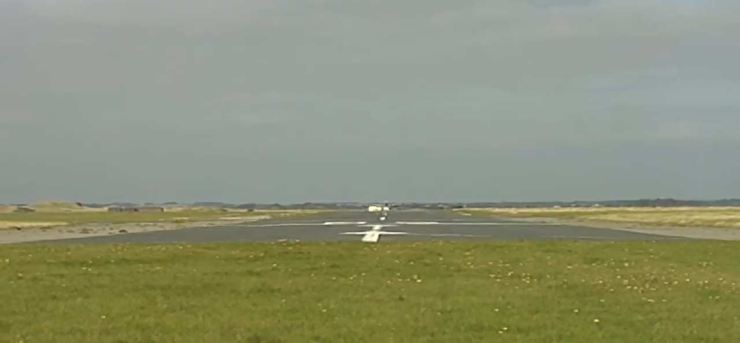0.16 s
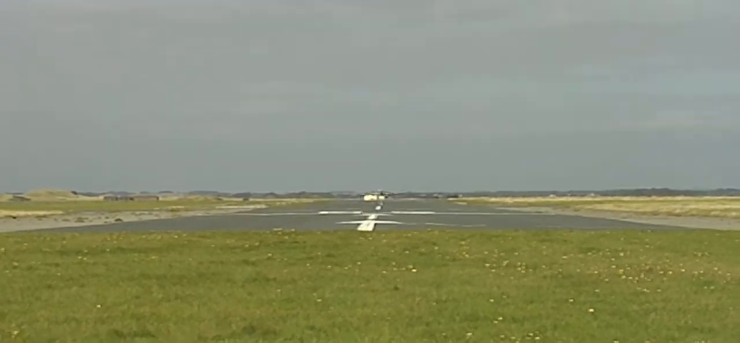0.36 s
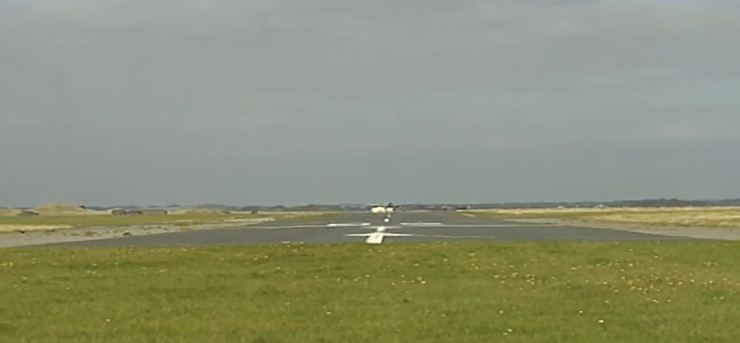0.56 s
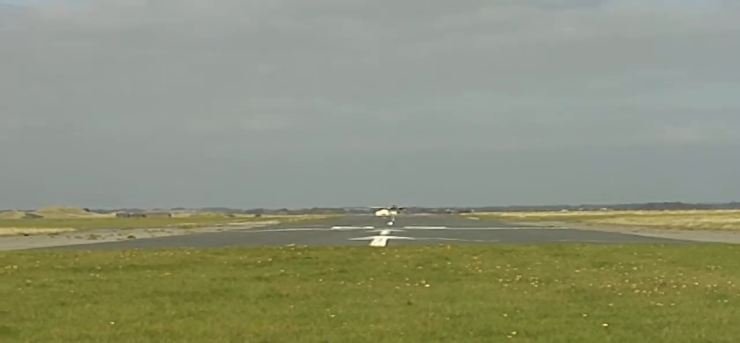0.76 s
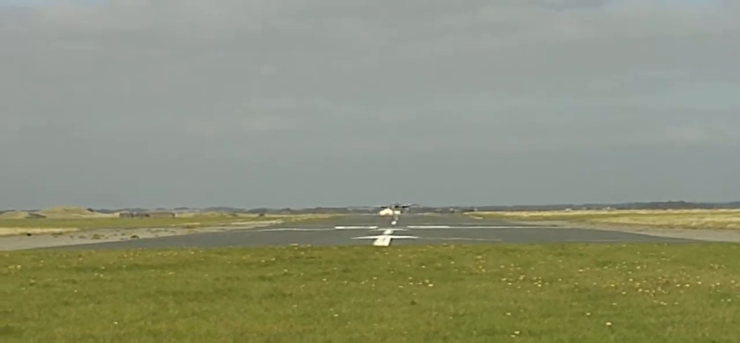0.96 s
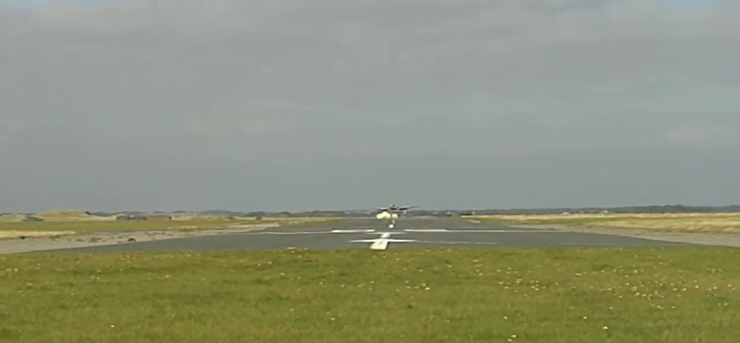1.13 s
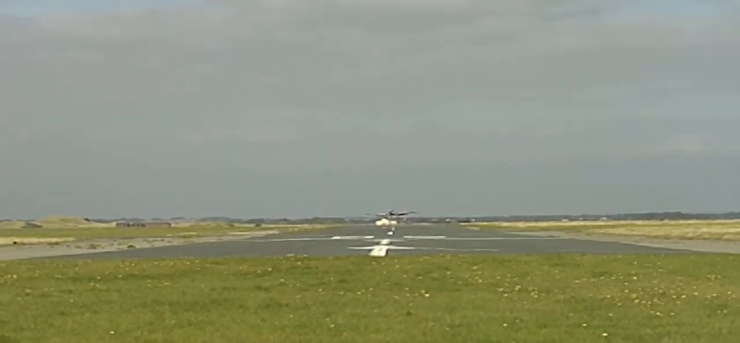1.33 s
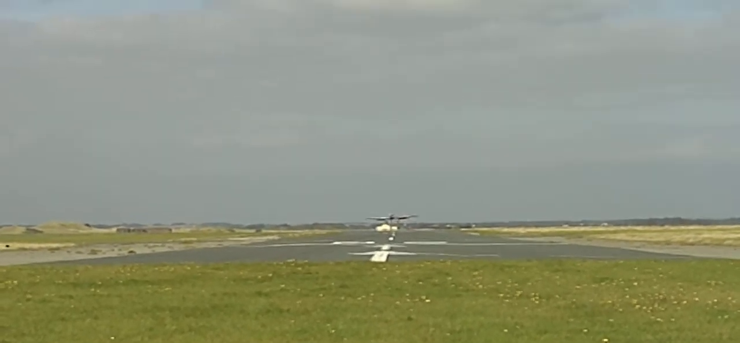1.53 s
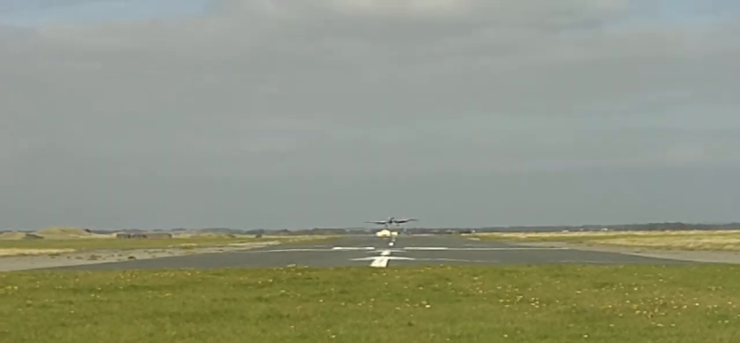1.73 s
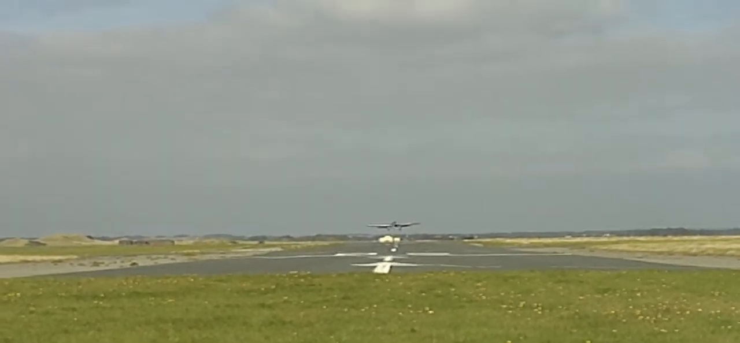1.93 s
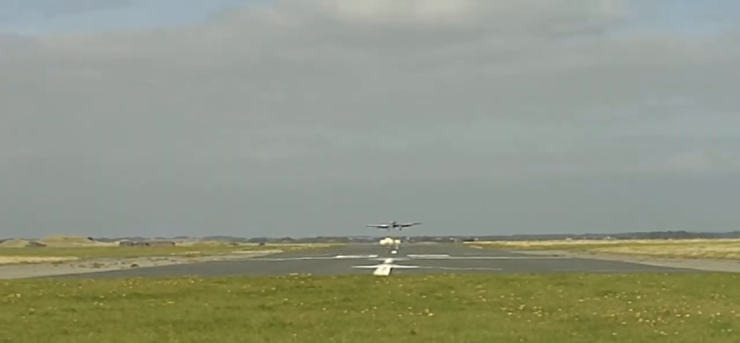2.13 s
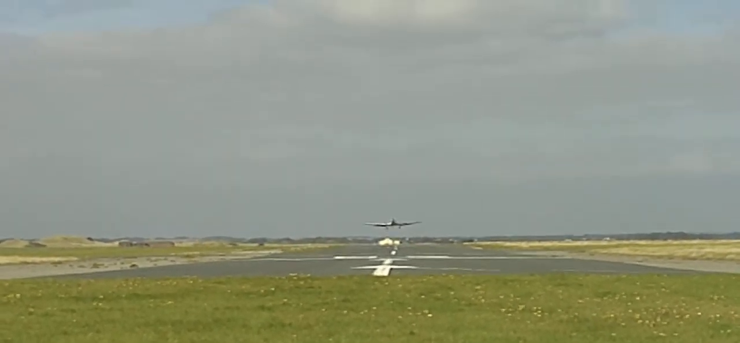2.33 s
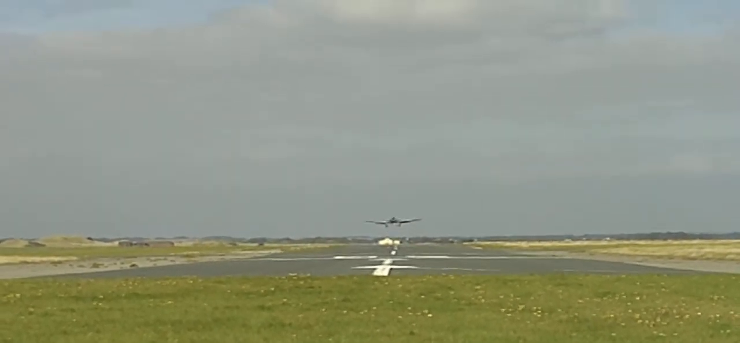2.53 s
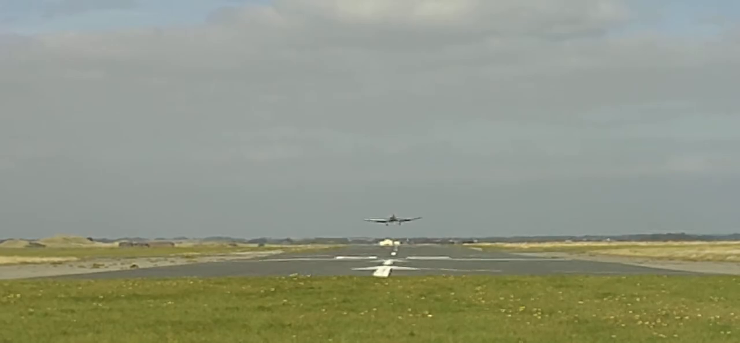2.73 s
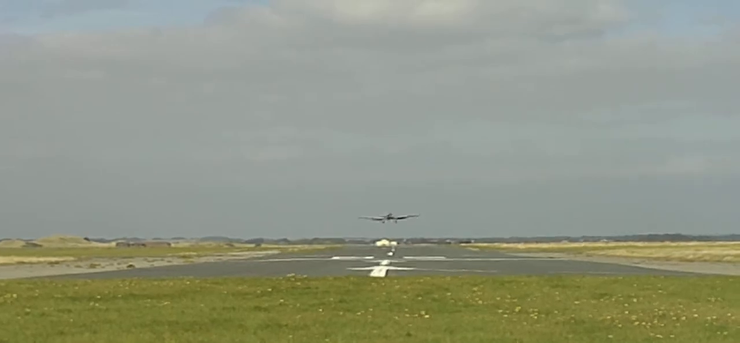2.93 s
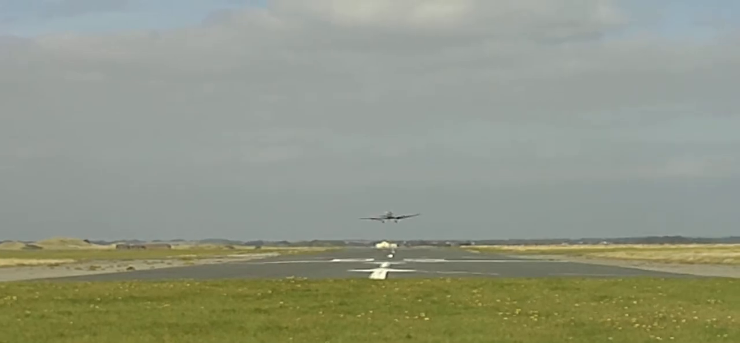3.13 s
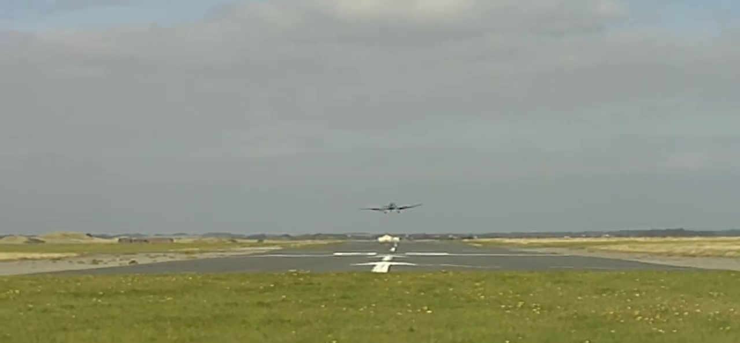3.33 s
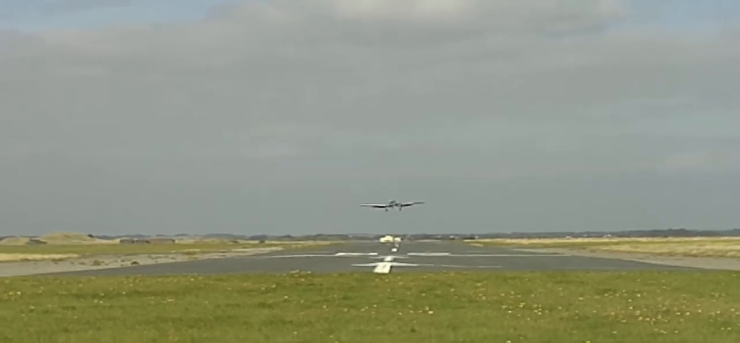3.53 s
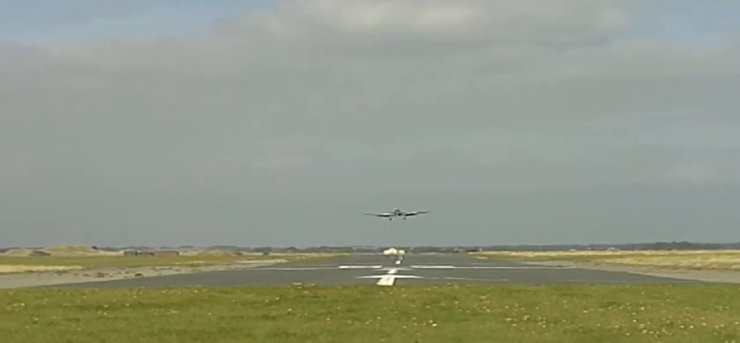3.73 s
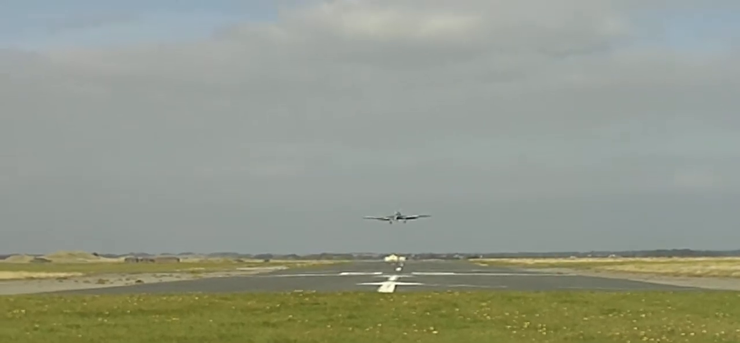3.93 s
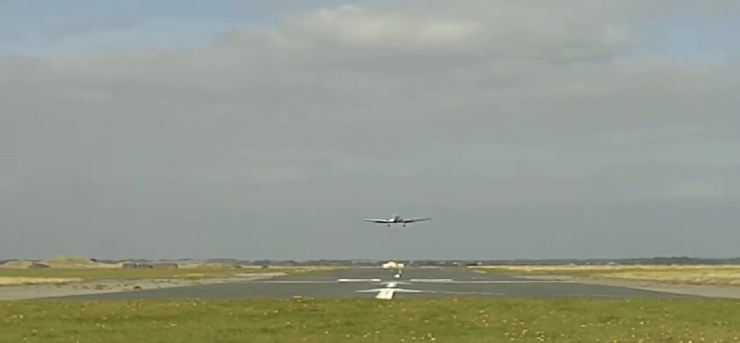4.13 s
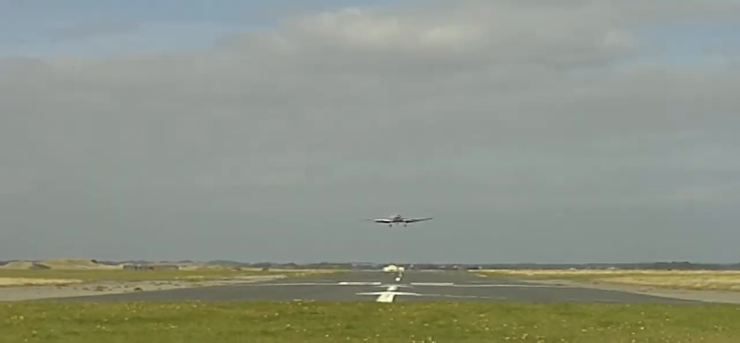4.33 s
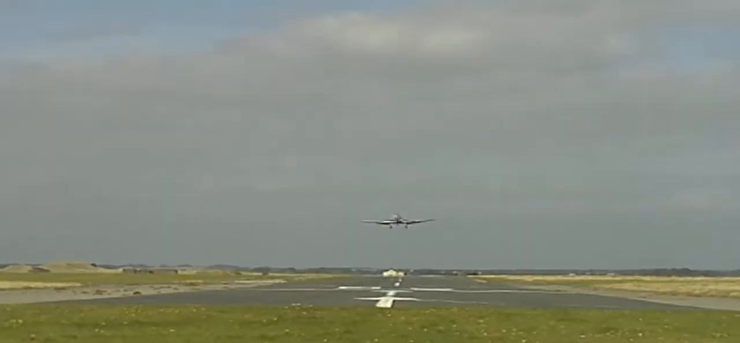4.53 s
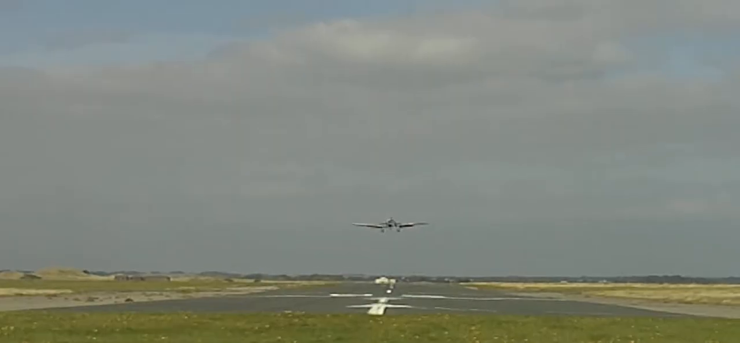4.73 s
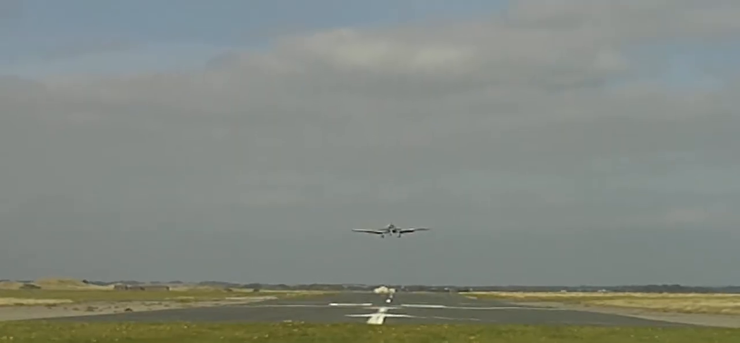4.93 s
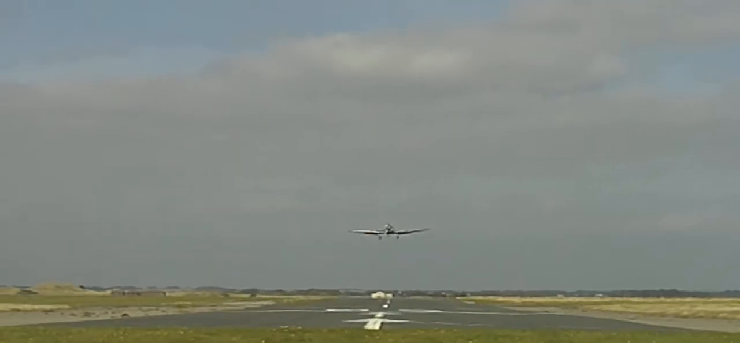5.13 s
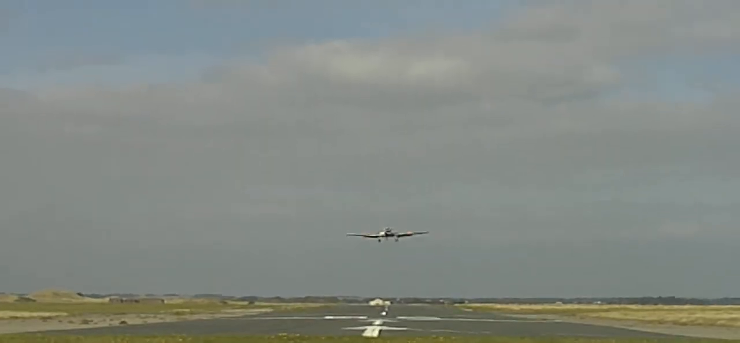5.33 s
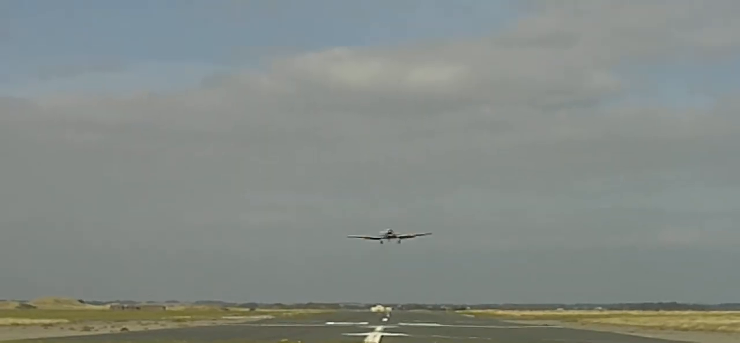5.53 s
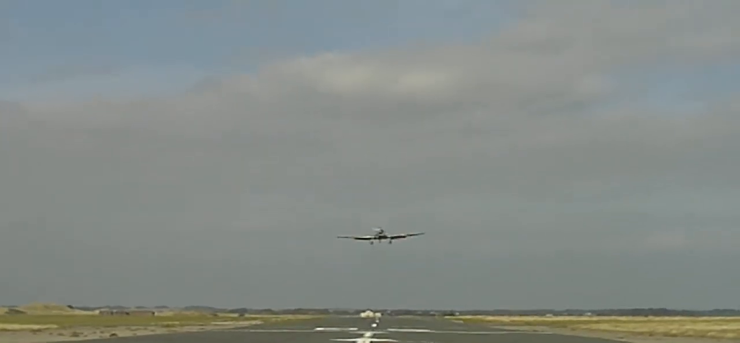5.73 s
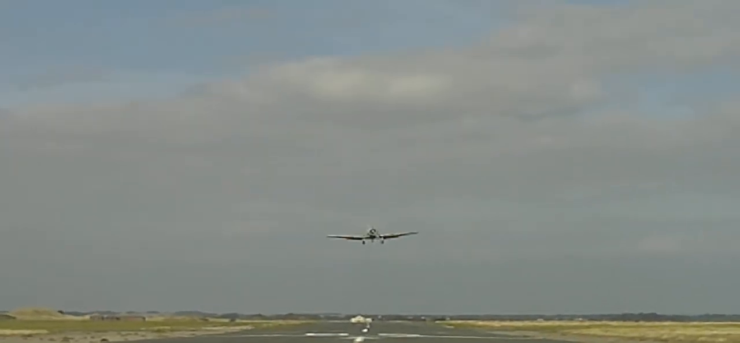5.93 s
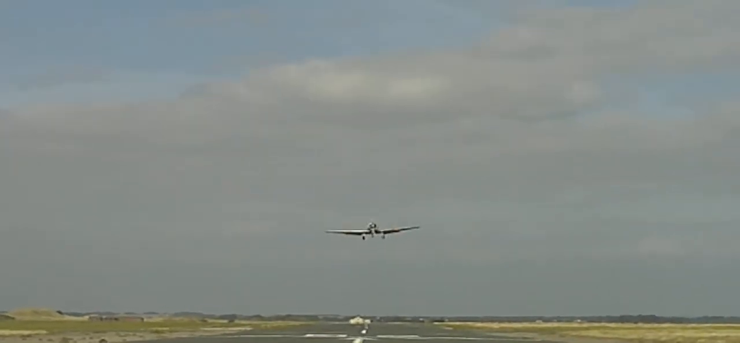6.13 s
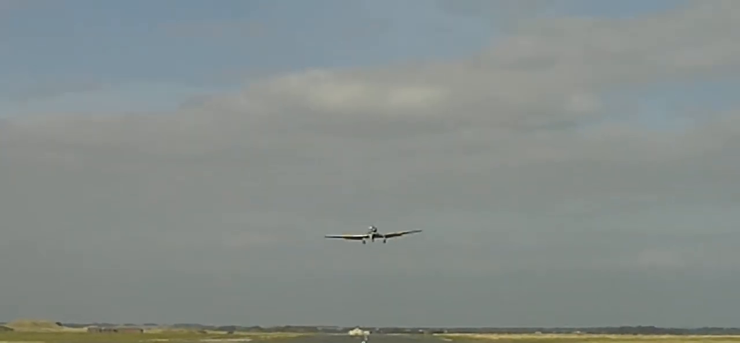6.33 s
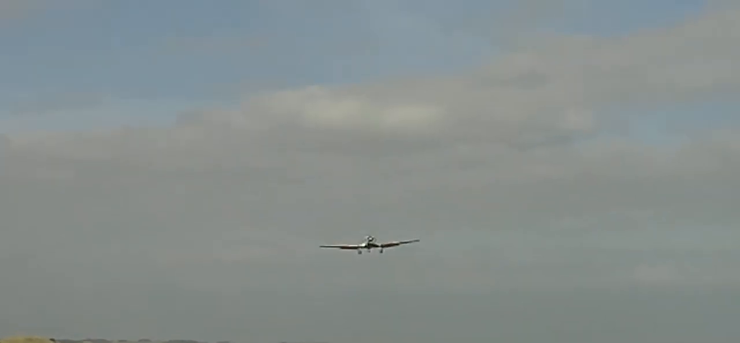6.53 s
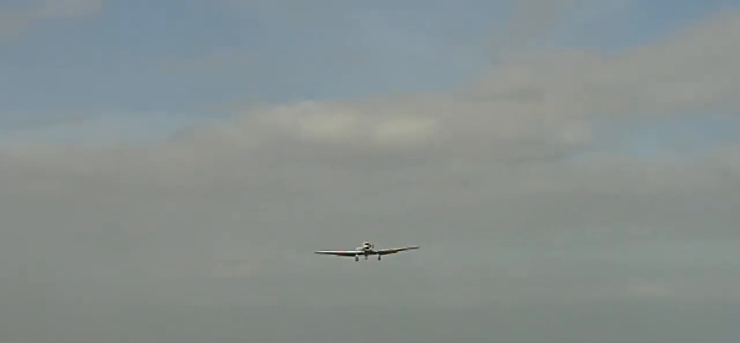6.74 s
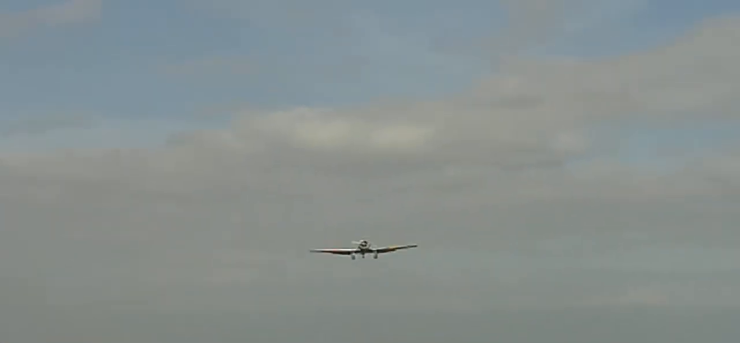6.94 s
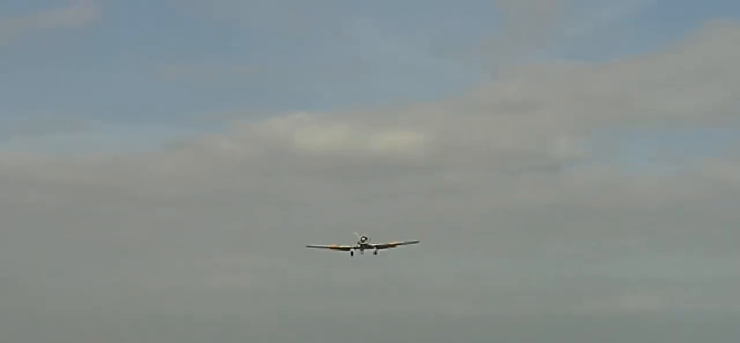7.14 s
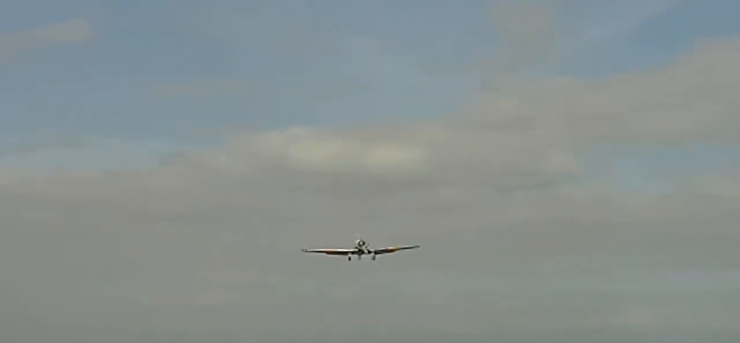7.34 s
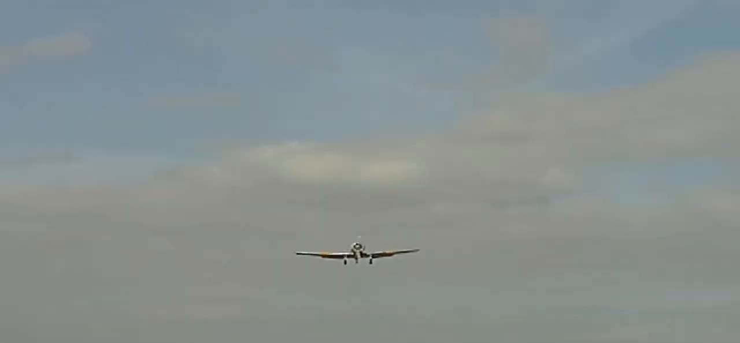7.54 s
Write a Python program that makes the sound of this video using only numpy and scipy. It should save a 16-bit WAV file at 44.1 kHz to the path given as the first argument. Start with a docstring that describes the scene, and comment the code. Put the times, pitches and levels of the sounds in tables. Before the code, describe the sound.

A propeller plane approaches from far away, its engine drone swelling into a loud, rasping growl over wind rumble on the microphone.

```python
"""Wind rumbles on the microphone over a far-off drone and a thin propeller whine and buzz.
A nine-cylinder radial-engined aircraft is climbing from a runway towards the listener at steady revs.
Its blades hum and its exhaust, a mix of engine tones and puffs of gas, swells and opens into a rasp.
The hand-held camera knocks a few times, and the hardest, closest firings overload the microphone."""
import sys
import numpy as np
from scipy import signal
from scipy.fft import rfft, irfft, next_fast_len
from scipy.io import wavfile

SR = 44100
rng = np.random.default_rng(int(sys.argv[2]) if len(sys.argv) > 2 else 0)


def wav_record(signal):
    """Record a signal, one row per channel, as 16-bit PCM in the file named by sys.argv[1]."""
    frames = np.transpose(np.atleast_2d(signal))
    bounded = np.clip(frames, -1, 1)
    # unit amplitude maps onto the largest positive 16-bit level
    quanta = np.round(bounded * 32767).astype(np.int16)
    wavfile.write(sys.argv[1], SR, quanta)


N = 338247
TIME = np.arange(N) / SR
CYLINDERS = 9


def from_db(db):
    """Decibels to gain."""
    return np.exp(np.asarray(db) * (np.log(10) / 20))


def rms_one(x):
    """Scale to unit rms."""
    return x / np.sqrt(np.mean(x ** 2) + 1e-20)


def curve(rows):
    """Join breakpoints into a value at every sample."""
    return np.interp(TIME, *np.transpose(rows))


def ramp(start_s, length_s):
    """A straight rise from 0 to 1."""
    return np.clip((TIME - start_s) / length_s, 0, 1)


def swell_and_fade(peak_s, peak_db, rise_db_per_s, fade_db_per_s):
    """Gain that climbs to a peak and sinks again."""
    past_peak = TIME - peak_s
    return from_db(peak_db + np.minimum(rise_db_per_s * past_peak, -fade_db_per_s * past_peak))


def follow(levels, near_db, depth):
    """Gain that rides a level curve, its moves scaled by depth; near_db when the source is close by."""
    close_by_db = -13
    return from_db(near_db + depth * (curve(levels) - close_by_db))


def blend(clean, rough, share):
    """Mix two unit-rms sounds; share is the clean one's part of the power."""
    share = np.clip(share, 0, 1)
    return np.sqrt(share) * clean + np.sqrt(1 - share) * rough


def drift(rate):
    """A smooth random wobble of spread 1 that changes about rate times a second."""
    step, run_in = 100, 2000
    r = np.exp(-2 * np.pi * rate * step / SR)
    white = rng.standard_normal(N // step + run_in + 2)
    slow = rms_one(signal.lfilter([1], [1, -2 * r, r * r], white)[run_in:])
    return np.interp(np.arange(N) / step, np.arange(len(slow)), slow)


def coloured(x, spectrum):
    """Shape a sound with an EQ curve that rolls off beyond its ends; rms 1."""
    size = next_fast_len(N)
    hz, db = np.transpose(spectrum)
    log_hz = np.log(np.maximum(np.fft.rfftfreq(size, 1 / SR), 1))
    gain = from_db(np.interp(log_hz, np.log(hz), db))
    skirts = np.exp(-4 * np.abs(log_hz - np.clip(log_hz, np.log(hz[0]), np.log(hz[-1]))))
    return rms_one(irfft(rfft(x, size) * gain * skirts, size)[:N])


def noise(spectrum):
    """Steady coloured noise."""
    return coloured(rng.standard_normal(N), spectrum)


def tones(cycles, orders, flicker_db, flicker_hz, wander_rad):
    """Harmonics of a rotation, each wavering in level and phase in turbulent air; rms 1."""
    out, angle = np.zeros(N), 2 * np.pi * (cycles % 1)
    for multiple, db in orders:
        k = round(multiple)
        stagger = 2 * np.pi * k * k / CYLINDERS  # keeps them from piling up in one beat
        phase = k * angle + stagger + wander_rad * drift(3.1)
        out += from_db(db + flicker_db * drift(flicker_hz)) * np.sin(phase)
    return rms_one(out)


def struck(times, levels_db, modes, grit_db, grit_s):
    """Clicks with brief gritty tails ring damped modes, neighbours in opposite polarity."""
    clicks, out = np.zeros(N), np.zeros(N)
    clicks[np.round(times * SR).astype(int)] = from_db(levels_db)
    tail = signal.lfilter([1], [1, -np.exp(-1 / (grit_s * SR))], clicks + 1e-18)
    force = clicks + from_db(grit_db) * tail * np.diff(rng.standard_normal(N + 1))
    for k, (hz, db, t60) in enumerate(modes):
        r, w = from_db(-60 / (t60 * SR)), 2 * np.pi * hz / SR
        ring = signal.lfilter([0, np.sin(w)], [1, -2 * r * np.cos(w), r * r], force)
        out += (-1) ** k * from_db(db) * ring
    return out


# The colour of open air. Each row: frequency in Hz, relative level in dB.
AIR_EQ = [(200, -7), (320, 1), (450, -7), (650, -14), (1000, -5), (1450, -12.5), (1750, -17), (2900, -19.5),
          (4500, -24), (5600, -31.5), (6500, -39), (7500, -52)]

def air_hiss():
    """A smooth bed of hiss that lifts after the loudest knock, holds and settles."""
    lift = ramp(3.3, 0.21) - ramp(4.14, 0.94)
    return from_db(-38.5 + 2.5 * lift) * noise(AIR_EQ)


# The colour of the wind. Each row: frequency in Hz, relative level in dB.
WIND_EQ = [(10, -9), (25, -2.5), (55, 2), (100, 2.5), (180, -11), (280, -13), (600, -48.5)]

def wind():
    """Lumpy rumble on the microphone from a steadily freshening wind."""
    start_db, rise_db_per_s = -33.5, 1.6
    lumps_db = 2.0 * drift(21)
    return from_db(start_db + rise_db_per_s * TIME + lumps_db) * noise(WIND_EQ)


# Bumps of the hand. Each row: start in seconds, knock strength in dB, tick strength in dB.
KNOCKS = [(.3492, -42, -13.5), (0.3659, -24, -56), (1.369, -27.5, -31), (3.0486, -9, -32.5),
          (3.330, -23, -45), (3.431, -23, -49), (3.851, -19.5, -16.5)]
# The case's knock and its plastic tick. Each row: frequency in Hz, gain in dB, 60 dB decay in seconds.
BODY_MODES = [(895, 11.5, 0.012), (1150, -7.5, 0.0056), (1320, -14.5, 0.06), (1840, -7, 0.011),
              (2070, -7, 0.011)]
TICK_MODES = [(2930, -7.5, 0.018), (3550, -11.5, 0.018), (3970, -13.5, 0.018), (4250, -14.5, 0.016),
              (5050, -7.5, 0.007), (6100, -8, 0.0044), (6500, -16.5, 0.012)]

def handling():
    """The camera's case knocks and ticks in the hand; it is too small to radiate bass."""
    times, knock_db, tick_db = np.transpose(KNOCKS)
    knocks = struck(times, knock_db, BODY_MODES, grit_db=-10.0, grit_s=0.0012)
    ticks = struck(times, tick_db, TICK_MODES, grit_db=-20.5, grit_s=0.0015)
    return signal.sosfilt(signal.butter(4, 740, "high", fs=SR, output="sos"), knocks + ticks)


# The blades' hum, throbbing on its way through the air. Each row: time in seconds, relative level in dB.
PROPELLER_LEVEL = [(0.0, -57), (0.72, -40), (2.41, -24.5), (2.73, -33), (3.1, -21), (3.63, -19.5),
                   (3.82, -33), (3.87, -18), (4.06, -25), (4.25, -17.5), (4.55, -39), (4.57, -21.5),
                   (4.98, -19), (5.04, -36), (5.19, -19), (7.11, -18.5), (7.22, -14.5), (7.67, -17)]
# Their low whine and thin buzz. Each row: multiple of the blade rate, relative level in dB.
WHINE_ORDERS = [(6, -16.5), (7, -11.5), (8, 5), (9, -1.5), (10, -2.5), (12, -6)]
BUZZ_ORDERS = [(15, -7), (16, -0.5), (17, 0), (18, -12.5), (19, -14)]

def propeller(cycles):
    """The blades hum; their upper harmonics stand out only at long range, the buzz lingering longest."""
    blade_order = 4  # two blades, two revolutions per engine cycle
    hum = tones(cycles, [(blade_order, 0)], flicker_db=0.5, flicker_hz=11.0, wander_rad=0.31)
    hum *= from_db(curve(PROPELLER_LEVEL) - 0.5)
    whine = tones(cycles * blade_order, WHINE_ORDERS, flicker_db=2.5, flicker_hz=8.2, wander_rad=0.5)
    whine *= swell_and_fade(peak_s=1.0, peak_db=-37, rise_db_per_s=5, fade_db_per_s=11)
    buzz = tones(cycles * blade_order, BUZZ_ORDERS, flicker_db=4.0, flicker_hz=5.1, wander_rad=1.0)
    buzz *= swell_and_fade(peak_s=1.6, peak_db=-45.5, rise_db_per_s=3, fade_db_per_s=4.5)
    return hum + whine + buzz


# The fader on the engine's hum. Each row: time in seconds, relative level in dB.
ENGINE_HUM_LEVEL = [(0, -42), (0.95, -40.5), (1.1, -38.5), (1.9, -34.5), (2.45, -31), (3.0, -30.5),
                    (3.8, -24), (5.3, -21), (6.55, -19.5), (7.05, -23), (7.4, -20), (7.67, -19.5)]

def engine_hum(cycles):
    """The eleventh engine order carries further than the rest and levels off early."""
    hum = tones(cycles, [(11, 0)], flicker_db=0.65, flicker_hz=6.0, wander_rad=0.06)
    return from_db(curve(ENGINE_HUM_LEVEL) + 1.23) * hum


def puffs(cycles, repeat_share, sharpness, uneven_db, scatter_db):
    """One puff of gas per firing: part repeats every engine cycle, part is fresh turbulence."""
    size = 2048
    repeating = np.interp(cycles % 1 * size, np.arange(size), rng.standard_normal(size))
    gas = blend(rms_one(repeating), rng.standard_normal(N), repeat_share)
    firing = cycles * CYLINDERS
    number = firing.astype(int)
    cylinder_db = uneven_db * rms_one(rng.standard_normal(CYLINDERS))
    firing_db = scatter_db * rng.standard_normal(N // CYLINDERS)
    strength = from_db(cylinder_db[number % CYLINDERS] + firing_db[number])
    return gas * strength * np.exp(-sharpness * (firing % 1))


# The engine's pitched core. Each row: multiple of the cycle rate, relative level in dB.
ENGINE_ORDERS = [(1, -23), (2, -24), (3, -5.5), (5, -14), (6, -14.5), (7, -5), (8, -5.5), (9, 0), (10, -9),
                 (12, -18), (13, -16), (14, -32), (15, -9.5), (16, -9.5), (17, -20), (18, -10.5), (19, -12),
                 (20, -8), (21, -21), (22, -4), (23, -22.5), (24, -17), (25, -10), (26, -16.5), (27, -8.5),
                 (28, -12.5), (29, -14.5), (30, -15.5), (31, -5), (32, -14.5), (33, -10.5), (34, -19.5),
                 (35, -11.5), (36, -12.5), (37, -23)]

def engine_tones(cycles, lowest, highest, **waver):
    """Unequal cylinders sound multiples of the engine cycle; play one range of them."""
    orders = [(k, db) for k, db in ENGINE_ORDERS if lowest <= round(k) <= highest]
    return tones(cycles, orders, **waver)


# The bass, which arrives early and then holds. Each row: time in seconds, relative level in dB.
BASS_LEVEL = [(0, -28), (0.5, -27), (1.15, -35), (2.1, -28.5), (3.0, -25.5), (3.1, -20.5), (4.4, -16),
              (5.8, -13), (7.67, -12.5)]
# The colours of the rumble and the scattered drone. Each row: frequency in Hz, relative level in dB.
RUMBLE_EQ = [(45, -16), (62, 1), (85, -2), (125, 0), (165, 0.5), (205, -7), (250, -6.5)]
DRONE_EQ = [(45, -23), (70, -7.5), (100, -2.5), (135, 6.5), (175, 7.5), (225, -4), (260, -14.5),
            (400, -31.5)]

def rumble_and_drone(cycles):
    """Uneven firings shake out a rumble under a drone that, from far away, is scattered into noise."""
    gas = puffs(cycles, repeat_share=0.04, sharpness=0.8, uneven_db=-3.0, scatter_db=1.5)
    rumble = follow(BASS_LEVEL, near_db=-23.0, depth=1.08) * coloured(gas, RUMBLE_EQ)
    pitched = engine_tones(cycles, 1, 12, flicker_db=1.33, flicker_hz=5.1, wander_rad=0.018)
    clearness = curve([(0, 0.059), (2.7, 1)])
    drone = blend(pitched, noise(DRONE_EQ), clearness)
    return rumble + follow(BASS_LEVEL, near_db=-14.0, depth=0.99) * drone


# The growl's rise as the range closes. Each row: time in seconds, level in dB.
GROWL_LEVEL = [(0, -52.5), (2.1, -39.5), (3.1, -35.5), (4.1, -31), (5.05, -27), (5.7, -22.5), (6.75, -18),
               (7.25, -16.5), (7.67, -15)]
# The colour of its gas. Each row: frequency in Hz, relative level in dB.
GROWL_EQ = [(200, -20.5), (280, -3.5), (350, 0.5), (420, -4), (520, -3), (640, -26.5)]

def growl(cycles):
    """The exhaust's low mids: turbulent gas, with tones that come through later than the drone's."""
    pitched = engine_tones(cycles, 13, 24, flicker_db=1.43, flicker_hz=6.2, wander_rad=0.15)
    gas = puffs(cycles, repeat_share=0.49, sharpness=0.96, uneven_db=3.5, scatter_db=-1.0)
    clearness = 0.59 * ramp(2.52, 0.28)
    return from_db(curve(GROWL_LEVEL)) * blend(pitched, coloured(gas, GROWL_EQ), clearness)


# The surging approach of bark and rasp. Each row: time in seconds, relative level in dB.
MID_LEVEL = [(0, -44), (2.5, -41), (2.9, -36), (3.25, -30), (4.7, -26), (5.45, -20.5), (5.9, -19),
             (6.85, -18.5), (7.05, -14), (7.21, -14), (7.26, -12), (7.67, -9.5)]
# The colour of the bark's gas. Each row: frequency in Hz, relative level in dB.
BARK_EQ = [(430, -27.5), (550, -4.5), (588, 7.5), (625, 0.5), (690, 3.5), (760, 1.5), (850, -1.5),
           (940, -16), (1300, -29.5)]

def bark(cycles):
    """The exhaust's midrange: half the highest engine orders, half turbulence."""
    pitched = engine_tones(cycles, 25, np.inf, flicker_db=2.5, flicker_hz=5.0, wander_rad=0.42)
    gas = puffs(cycles, repeat_share=0.028, sharpness=1.1, uneven_db=1.2, scatter_db=1.54)
    gain = follow(MID_LEVEL, near_db=-12.5, depth=0.98)
    return gain * blend(pitched, coloured(gas, BARK_EQ), share=0.49)


# The colour of the rasp. Each row: frequency in Hz, relative level in dB.
RASP_EQ = [(750, -11.5), (950, -4), (1150, 0.5), (1370, 2), (1530, -2.5), (1680, -17.5), (2000, -22.5),
           (2600, -49.5)]

def rasp(cycles):
    """Puffs in the upper mids that open up as the aircraft climbs clear of the ground."""
    opening_db = -9 * (1 - ramp(5.06, 0.46))
    gain = follow(MID_LEVEL, near_db=-21.5, depth=0.76) * from_db(opening_db)
    gas = puffs(cycles, repeat_share=0.4, sharpness=0.7, uneven_db=-0.2, scatter_db=-1.0)
    return gain * coloured(gas, RASP_EQ)


# The crackle, which only carries at close range. Each row: time in seconds, relative level in dB.
CRACKLE_LEVEL = [(0, -81), (3, -53.5), (4.6, -46), (5.4, -41.5), (6.1, -36), (6.6, -36), (7.2, -29.5),
                 (7.52, -29), (7.67, -29.5)]
# Its colour. Each row: frequency in Hz, relative level in dB.
CRACKLE_EQ = [(1400, -36), (1800, 1.5), (1920, 0), (2020, -9), (2130, 1), (2250, 2), (2600, 0.5),
              (2950, 2.5), (3200, 3), (3450, -11), (3750, -6.5), (4300, -13), (5200, -18), (6500, -33),
              (8000, -47.5)]

def crackle(cycles):
    """The top edge of the puffs, comb-filtered by an inverted reflection close to the microphone."""
    notch_spacing_hz = 502.5
    gas = puffs(cycles, repeat_share=0.33, sharpness=0.67, uneven_db=-1.1, scatter_db=-0.6)
    reflection = -0.26 * np.interp(TIME - 1 / notch_spacing_hz, TIME, gas)
    return from_db(curve(CRACKLE_LEVEL)) * coloured(gas + reflection, CRACKLE_EQ)


# Accents in the exhaust. Each row: time of the peak in seconds, strength in dB.
HARD_FIRINGS = [(5.453, -5.5), (5.687, -11), (6.311, -5), (6.683, -7), (7.011, -4), (7.059, -10),
                (7.152, -2.5), (7.228, -5), (7.296, -11), (7.334, 0), (7.392, 1), (7.450, -4.5), (7.554, 0),
                (7.577, -4), (7.648, 0)]
# The pipe's resonances. Each row: frequency in Hz, gain in dB, half-width of the burst in seconds.
PIPE_MODES = [(200, -6, 0.0026), (695, -3, 0.0017), (1366, -14, 0.0012), (2800, -21.5, 0.00084)]

def hard_firings():
    """Now and then a cylinder fires harder: the exhaust pipe thumps and barks for a moment."""
    out = np.zeros(N)
    for peak_s, db in HARD_FIRINGS:
        for hz, mode_db, width_s in PIPE_MODES:
            near = np.abs(TIME - peak_s) < 4 * width_s
            since = TIME[near] - peak_s
            envelope = from_db(db + mode_db) * np.exp(-(since / width_s) ** 2)
            out[near] += envelope * np.cos(2 * np.pi * hz * since)
    return out


# The nearly steady revs. Each row: time in seconds, four-stroke cycles per second.
ENGINE_SPEED = [(0, 20.9), (1.1, 21.0), (2.05, 21.56), (2.9, 21.18), (3.5, 21.15), (4.35, 21.3),
                (5.5, 21.2), (6.5, 21.28), (7.67, 21.3)]

def aircraft():
    """Propeller and exhaust, both locked to the crankshaft, with single hard firings on top."""
    cycles = np.cumsum(curve(ENGINE_SPEED)) / SR
    blades = propeller(cycles)
    body = rumble_and_drone(cycles) + growl(cycles) + bark(cycles)
    treble = rasp(cycles) + crackle(cycles)
    gusts = from_db(drift(7.1))  # moving air along the path shakes the treble most
    return blades + body + gusts * treble + engine_hum(cycles) + hard_firings()


def scene():
    """Everything that reaches the one microphone."""
    return (aircraft() + wind() + air_hiss() + handling())[None]


def record(dry):
    """A dull microphone, rounded peaks that overload at full scale, and the top cut."""
    mic_top_hz, cutoff_hz = 7100, 15500
    knee, headroom = 0.7, 0.52
    dull = signal.sosfilt(signal.butter(14, mic_top_hz, fs=SR, output="sos"), dry)
    clean = np.clip(dull, -knee, knee)
    rounded = clean + headroom * np.tanh((dull - clean) / headroom)
    return signal.sosfilt(signal.butter(12, cutoff_hz, fs=SR, output="sos"), np.clip(rounded, -1, 1))


dry = scene()
out = record(dry)
wav_record(out)
```